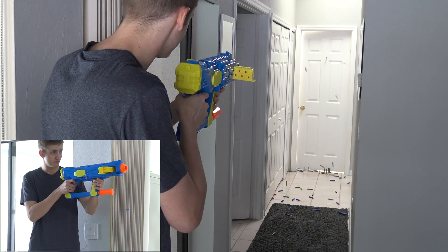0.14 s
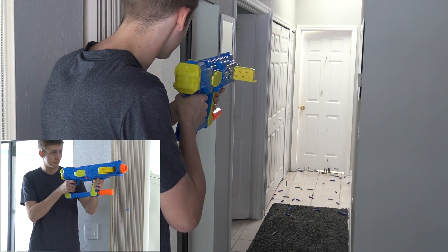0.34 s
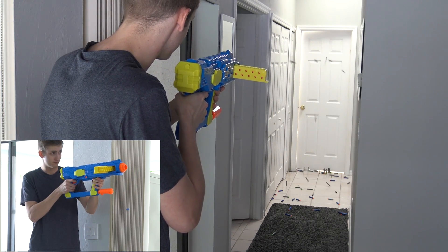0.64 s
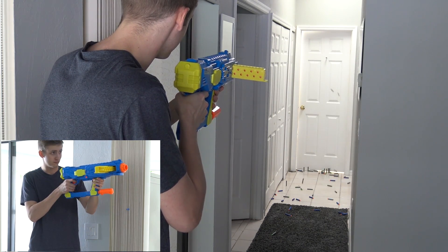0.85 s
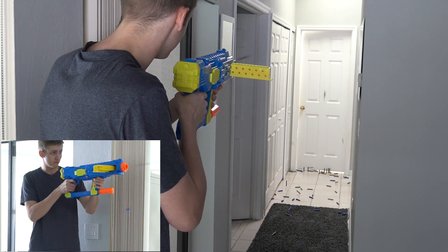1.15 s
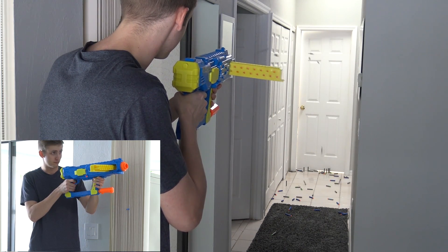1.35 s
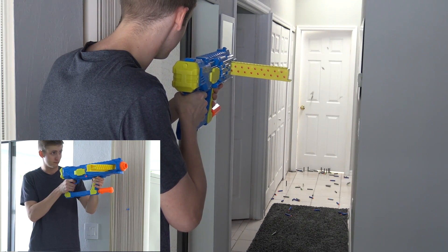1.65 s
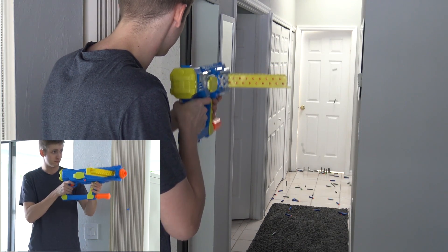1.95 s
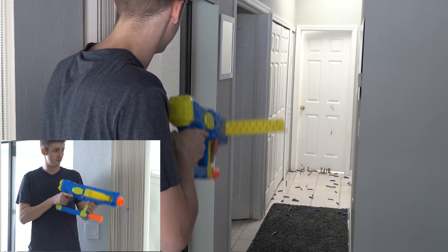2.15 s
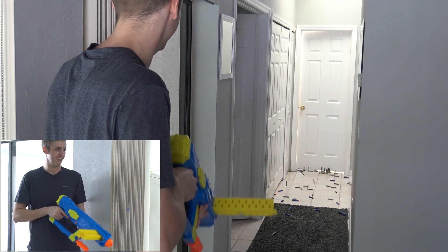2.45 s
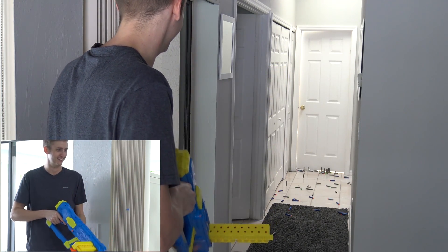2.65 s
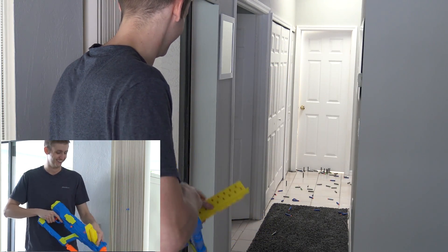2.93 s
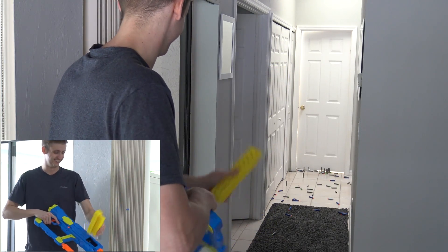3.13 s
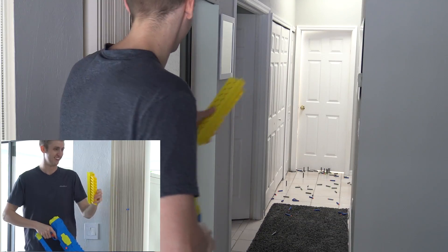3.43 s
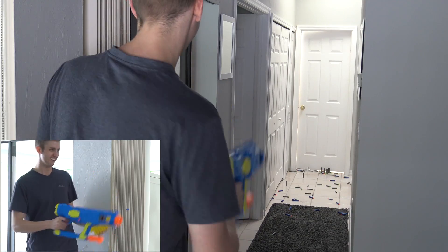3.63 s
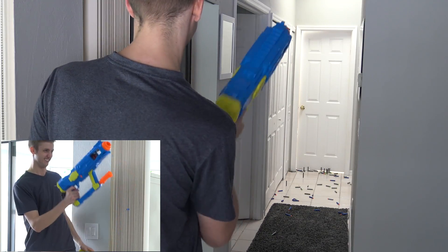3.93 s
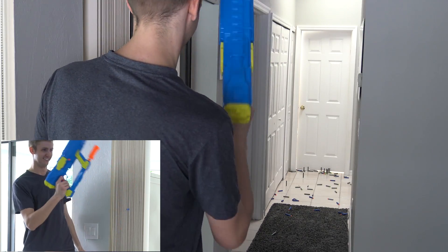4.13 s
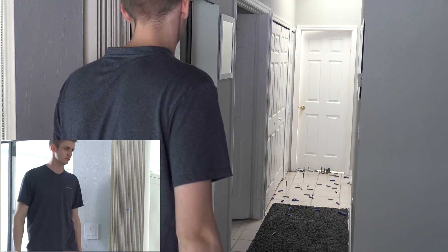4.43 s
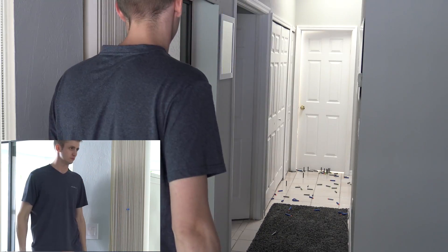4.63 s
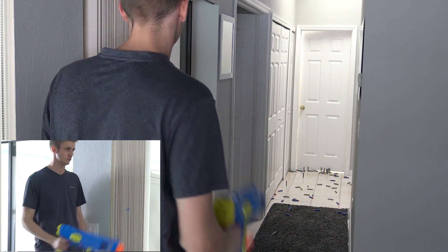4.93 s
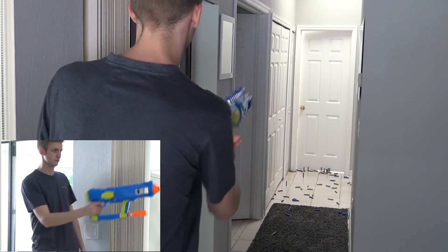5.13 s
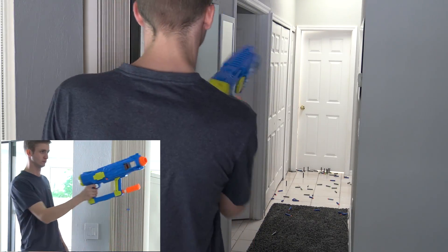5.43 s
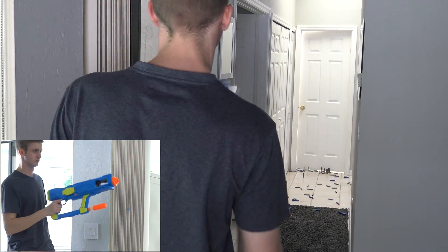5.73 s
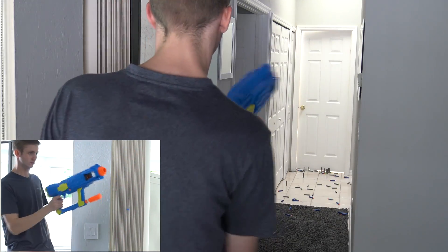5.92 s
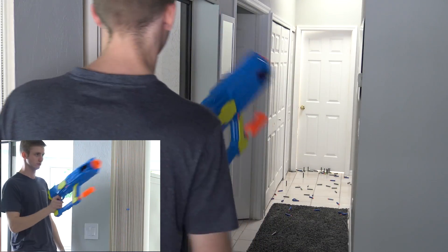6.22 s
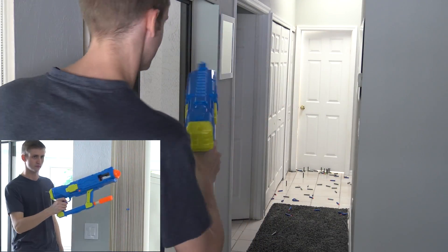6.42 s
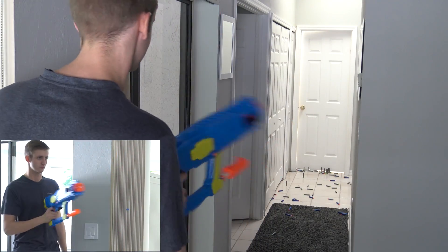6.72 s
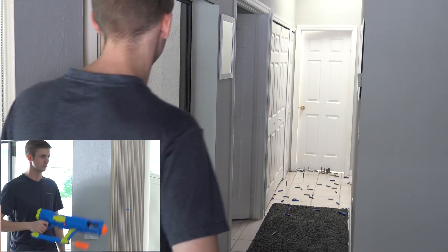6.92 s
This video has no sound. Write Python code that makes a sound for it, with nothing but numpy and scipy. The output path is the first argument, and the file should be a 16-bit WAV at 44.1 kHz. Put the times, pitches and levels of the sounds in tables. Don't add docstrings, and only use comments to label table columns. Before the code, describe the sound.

An air-powered toy dart blaster rattles off rapid bursts in an echoing hallway, with darts pattering on a door, magazine clacks and a long slowing burst.

```python
import sys
import numpy as np
from scipy import signal
from scipy.fft import rfft, irfft
from scipy.io import wavfile
from scipy.ndimage import uniform_filter1d

SR = 44100
rng = np.random.default_rng(int(sys.argv[2]) if len(sys.argv) > 2 else 0)


def put_to_file(sound):
    columns = np.atleast_2d(sound).T
    safe = np.clip(columns, -1, 1)
    whole_steps = np.round(safe * 32767)
    wavfile.write(sys.argv[1], SR, whole_steps.astype(np.int16))


def elevation(decibels):
    levels = np.asarray(decibels, float)
    return 10 ** (levels / 20)


N = 311787
LEAD = SR // 4
M = N + LEAD
SCENE_CHANGE_S = 4.502


def rms_one(x):
    return x / np.sqrt(np.mean(x ** 2) + 1e-20)


def in_time(rows, quiet=None):
    s, *columns = np.transpose(rows)
    return [np.interp((np.arange(M) - LEAD) / SR, s, c, quiet, quiet) for c in columns]


def at_hz(points, hz):
    return np.interp(np.log(hz), np.log(np.array(points)[:, 0]), np.array(points)[:, 1])


def colour(x, points):
    size = 4096
    cepstrum = irfft(np.log(elevation(at_hz(points, np.fft.rfftfreq(size, 1 / SR) + 1))))
    cepstrum[1:size // 2] *= 2
    cepstrum[size // 2 + 1:] = 0
    response = irfft(np.exp(rfft(cepstrum)))
    return signal.oaconvolve(x, response / np.sqrt(np.sum(response ** 2)))[:len(x)]


def resonate(x, hz, width_hz):
    r = np.exp(-np.pi * width_hz / SR)
    top = np.array([1, 0, -1]) * (1 - r * r) / 2
    return signal.lfilter(top, [1, -2 * r * np.cos(2 * np.pi * hz / SR), r * r], x + 1e-18)


def marks(times, db):
    out = np.zeros(M)
    np.add.at(out, np.round(np.asarray(times) * SR).astype(int) + LEAD, elevation(db))
    return out


def envelope(clicks, rise_s, fall_s):
    t = np.arange(SR // 10) / SR
    shape = (1 - np.exp(-t / rise_s)) * np.exp(-t / fall_s)
    return signal.oaconvolve(clicks, shape / shape.max())[:M]


def decaying(times, db, hz, fall_s):
    t = np.arange(SR // 16) / SR
    tone = np.sin(2 * np.pi * hz * t) * t / fall_s * np.exp(1 - t / fall_s)
    return signal.oaconvolve(marks(times, db), tone)[:M]


def swells(start, hold, db, rise_db, fall_db):
    t = np.arange(0, M + 64, 64)[:, None] / SR - LEAD / SR
    before_s = np.maximum(start - t, 0)
    after_s = np.maximum(t - start - hold, 0)
    gain = elevation(db - rise_db * before_s - fall_db * after_s).sum(axis=1)
    return np.interp((np.arange(M) - LEAD) / SR, t[:, 0], gain)


# pitch_hz, level_db (rms)
MAINS_HUM = [(60.3, -48), (86.1, -63), (119.5, -56.5), (290.7, -65)]
# pitch_hz, level_db (per Hz)
NOISE_FLOOR = [(15, -26.5), (30, -11), (70, -17), (130, -21), (250, -20.5), (450, -21), (900, -31),
               (1800, -33.5), (3500, -44), (6000, -45), (9000, -73.5), (16000, -76.5)]
HUM_DB, FLOOR_DB = (-8, 3), (-56.5, -50)
HUM_FADE_DB_PER_S = 2.5


def ambient():
    t = np.arange(M) / SR
    after = t - LEAD / SR - SCENE_CHANGE_S
    hum_db = np.where(after < 0, HUM_DB[0], HUM_DB[1] - HUM_FADE_DB_PER_S * after)
    floor_db = np.where(after < 0, *FLOOR_DB)
    hum = sum(np.sqrt(2) * elevation(db) * np.sin(2 * np.pi * hz * t) for hz, db in MAINS_HUM)
    return elevation(hum_db) * hum + elevation(floor_db) * colour(rng.standard_normal(M), NOISE_FLOOR)


# pitch_hz, t60_s
HALL_DECAY = [(130, 0.54), (300, 0.76), (550, 0.75), (1000, 0.97), (2800, 0.81), (7000, 0.74),
              (14000, 0.36)]
# pitch_hz, level_db
HALL_TONE = [(80, -8.5), (300, -0.5), (1000, 5), (3000, 0), (6000, -2), (9000, -3.5), (15000, -5.5)]
# delay_s, level_db
REFLECTIONS = [(.008, -2), (.021, -12), (.047, -12.5)]
FIXED_PATHS = 0.3


def hallway(sent):
    step = 32
    t = np.arange(SR * 3 // 2 // step) * step / SR
    cut = round(LEAD + SCENE_CHANGE_S * SR) // step
    white, out, response = rng.standard_normal((2, M)), 0, 0
    edges = 130 * 2 ** np.arange(0, 7.1, .25)
    echoes = sum(elevation(db + 12.5) * (t > s) * np.exp(-np.abs(t - s) / 0.0017) for s, db in REFLECTIONS)
    build = (1 - np.exp(-t / 0.022) + echoes) ** 2 * step / SR
    for k, (low, high) in enumerate(zip(edges, edges[1:])):
        hz = np.sqrt(low * high)
        band = signal.butter(2, [low, high], "band", fs=SR, output="sos")
        source, noise = signal.sosfilt(band, [sent + 1e-18, white[k % 2]])
        energy = np.mean(source[:M // step * step].reshape(-1, step) ** 2, axis=1)
        spread = build * elevation(at_hz(HALL_TONE, hz) - 60 * t / at_hz(HALL_DECAY, hz)) ** 2
        tail = [signal.fftconvolve(part, spread)[:len(part)] for part in np.split(energy, [cut])]
        response = response + noise[:len(t) * step] * np.repeat(np.sqrt(spread / step), step)
        strength = np.sqrt(np.abs(np.concatenate(tail)))
        out = out + rms_one(noise) * np.interp(np.arange(M) / step, np.arange(len(energy)), strength)
    same = [signal.fftconvolve(part, response)[:len(part)] for part in np.split(sent, [cut * step])]
    return np.sqrt(1 - FIXED_PATHS) * out + np.sqrt(FIXED_PATHS) * np.concatenate(same)


# start_s, hold_s, hiss_db, whistle_db (above the hiss)
AIR_PUFFS = [(0.88, 0.13, -28.5, 0), (1.096, 0.098, -28, -4.5), (2.3, .08, -47.5, -1),
             (2.431, 0.12, -44.5, -4), (2.621, .1, -59.5, -4), (3.647, 0.04, -41.5, -13),
             (4.652, 0.011, -46, -15), (4.853, .01, -53, -2), (4.931, .06, -60, 0)]
PUFF_RISE_DB_PER_S, HISS_FALL_DB_PER_S, WHISTLE_FALL_DB_PER_S = 702, 247, 88.5
THIN_BELOW_DB, THIN_FALL_DB_PER_S = 9, 129.5


def seep():
    s, hold, db, whistle_db = np.transpose(AIR_PUFFS)
    whistle_gain = swells(s, hold, db + whistle_db, PUFF_RISE_DB_PER_S, WHISTLE_FALL_DB_PER_S)
    hiss_gain = swells(s, hold, db, PUFF_RISE_DB_PER_S, HISS_FALL_DB_PER_S)
    thin_gain = swells(s, 0, db - THIN_BELOW_DB, PUFF_RISE_DB_PER_S, THIN_FALL_DB_PER_S)
    a, b, c = rng.standard_normal((3, M))
    whistle = resonate(resonate(a, 1310, 90), 1310, 200)
    hiss = resonate(b, 3640, 600) - elevation(-5.5) * resonate(b, 5100, 560) - elevation(-8) * resonate(b, 2000, 1200)
    thin = colour(c, [(5000, -17), (8500, -0.5), (13000, -1.5), (16000, -9.0)])
    return elevation(-3.5) * (whistle_gain * rms_one(whistle) + hiss_gain * rms_one(hiss) + thin_gain * thin)


# time_s, pitch_hz, level_db (rms)
VALVE_SQUEAL = [
    (3.656, 1485, -42),
    (3.69, 1426, -38.5),
    (3.7, 1400, -30),
    (3.72, 1337, -25),
    (3.726, 1340, -27.5),
]


def squeal():
    hz, level_db = in_time(VALVE_SQUEAL)[0], in_time(VALVE_SQUEAL, -200)[1]
    waver = 1 + 0.28 * rms_one(uniform_filter1d(rng.standard_normal(M), size=260))
    return np.sqrt(2) * elevation(level_db) * waver * np.sin(2 * np.pi * np.cumsum(hz) / SR)


# peak_s, tick_db, door_db (above the tick)
DART_VOLLEYS = [(0.159, -26, -6.5), (0.183, -7, -11.5), (0.214, -14, -8.5), (.275, -17, -10),
                (0.298, -6.5, -9), (.35, -27.5, -9.5), (0.892, -11, -18.5), (0.983, -13.5, -2.5),
                (1.09, -15.5, -6.5), (1.616, -15.5, -1.5), (1.754, -16, -1.5), (1.811, -11, -2.5),
                (1.935, -12.5, -3)]
# pitch_hz, width_hz, level_db
DOOR_MODES = [(146, 57, -9), (245, 40, -13.5), (340, 77, 2), (408, 150, 2), (548, 100, -1), (655, 70, -2.5)]
# pitch_hz, level_db (per Hz)
TIP_TICK = [(350, -53), (600, -3), (927, -13.5), (1260, -4.5), (1360, -12), (2270, -12.5), (3510, -9),
            (5940, -17.5), (14000, -54.5)]
VOLLEY_RISE_DB_PER_S, VOLLEY_FALL_DB_PER_S, DOOR_FALL_DB_PER_S = 452, 219, 262


def patter():
    s, tick_db, door_db = np.transpose(DART_VOLLEYS)
    tick_gain = swells(s, 0, tick_db, VOLLEY_RISE_DB_PER_S, VOLLEY_FALL_DB_PER_S)
    door_gain = swells(s, 0, tick_db + door_db, VOLLEY_RISE_DB_PER_S, DOOR_FALL_DB_PER_S)
    strength = elevation(0.87 * np.minimum(rng.exponential(1, M), 4))
    hits = (rng.random(M) < 700 / SR) * strength
    taps = envelope(hits, 0.0017, 0.01) * rng.standard_normal(M)
    door = sum(elevation(db) * resonate(taps, hz, width_hz) for hz, width_hz, db in DOOR_MODES)
    door = signal.sosfilt(signal.butter(4, 110, "high", fs=SR, output="sos"), door)
    return elevation(-0.5) * door_gain * rms_one(door) + elevation(-4.0) * tick_gain * rms_one(colour(taps, TIP_TICK))


# time_s, level_db (peak), ring_hz, brightness_db (per octave)
PLASTIC_CLACKS = [(2.9806, -25.5, 1240, -9), (3.0066, -11.5, 4670, -2), (3.0154, -22, 5160, -3),
                  (3.159, -13.5, 5000, -0.5), (3.1728, -5.5, 4200, 3), (3.632, -22.5, 2240, -1.5),
                  (3.655, -16, 1490, -5), (3.683, -15, 1390, -5.5), (4.4593, -26.5, 2000, -4),
                  (4.476, -23.5, 3330, -5.5), (4.4838, -18, 740, -3), (4.4944, -28, 703, 2),
                  (4.604, -43, 743, 4), (4.643, -35, 2820, -7), (4.655, -26, 770, -3),
                  (4.705, -34, 2310, -6), (4.847, -32.5, 734, -11), (4.888, -41, 703, 2.5),
                  (4.965, -31, 1480, -18), (5.0115, -14, 4770, -3), (5.0145, -6, 2640, -2.5)]
HIGH_TICKS = [(0.417, -37.5, 9660, 4.3), (0.859, -23, 11000, 5), (1.068, -26.5, 12400, 5),
              (1.0839, -26, 10820, 5), (4.645, -46, 9000, 3), (4.849, -36.5, 6000, 3)]
DULL_KNOCKS = [(3.013, -34.5, 291, -10), (3.008, -34, 140, -17), (2.8, -42, 240, -19), (3.2, -36, 180, -17)]
CLACK_S, TICK_S, KNOCK_S = 0.0084, .0015, .012


def clacks():
    out, t = np.zeros((2, M)), np.arange(SR // 8) / SR
    kinds = (PLASTIC_CLACKS, CLACK_S), (HIGH_TICKS, TICK_S), (DULL_KNOCKS, KNOCK_S)
    events = [(*row, length) for rows, length in kinds for row in rows]
    noise = rng.standard_normal((len(events), len(t)))
    for (s, db, hz, tilt_db, length), rattle in zip(events, noise):
        rattle = rattle * np.exp(-t / max(length, .001)) * (1 - np.exp(-t / (0.47 * length)))
        wide = colour(rattle, [(150, -12), (800, 1.5), (5000, tilt_db * 1.3), (16000, tilt_db * 4.6 - 22.5)])
        ring = elevation(15) * resonate(rattle, hz, hz / 13)
        at = round(s * SR) + LEAD
        out[:, at:at + len(t)] += elevation(db - 6.0) * np.array([wide, ring])
    return out


# time_s, level_db, pitch_hz, fall_s
MAGAZINE_TONES = [(3.006, -20, 5180, 0.0035), (3.177, -21, 2700, 0.0044), (3.175, -14.5, 3400, 0.0026),
                  (3.657, -33, 805, 0.0043)]


def magazine():
    return sum(decaying([s], db, hz, fall_s) for s, db, hz, fall_s in MAGAZINE_TONES)


# time_s, pop_db (peak)
EARLIER_SHOTS = [(-.075, -13.5), (-.02, -17.5)]
FIRST_BURST = [(0.4595, -6), (0.5095, -6.5), (0.567, -10), (0.635, -13.5)]
SECOND_BURST = [(1.1703, -8.5), (1.219, -10), (1.28, -11.5), (1.334, -12), (1.3934, -9), (1.4477, -13),
                (1.5289, -13), (1.5661, -13.5), (1.6156, -16), (1.6642, -14.5), (1.713, -15.5),
                (1.7645, -17.5), (1.8193, -13.5), (1.8964, -23)]
WEAK_BURST = [(3.7356, -15), (3.8028, -16.5), (3.895, -19.5)]
# time_s, pop_db (peak)
EMPTYING_BURST = [(5.0264, -14.5), (5.0453, -6.5), (5.0875, -13.5), (5.1706, -15.5), (5.4354, -13),
                  (5.7123, -14.5), (6.2005, -16.5), (6.3103, -15), (6.5081, -14), (6.5856, -13.5)]
ROW_SHOT = [0, 1, 2, 4, 10, 16, 26, 28, 31, 32]
SHOT_JITTER_S, SHOT_SCATTER_DB = 0.00027, 1.94


def firing():
    number = np.arange(ROW_SHOT[-1] + 1)
    s, db = np.transpose(EMPTYING_BURST)
    chance = rng.standard_normal((len(number), 2))
    run_s = np.interp(number, ROW_SHOT, s) + SHOT_JITTER_S * chance[:, 0]
    run_db = np.interp(number, ROW_SHOT, db) + SHOT_SCATTER_DB * chance[:, 1]
    run = np.transpose([run_s, run_db])
    return np.concatenate([EARLIER_SHOTS, FIRST_BURST, SECOND_BURST, WEAK_BURST, run]).T


# time_s, full_share (0-1)
TANK_PRESSURE = [(0, 0.7), (.46, 0.8), (1.2, 0.68), (1.8, 0.66), (1.9, 0), (3.7, 0), (5.03, .4),
                 (5.04, 0.9), (5.5, .8), (5.9, 0.42), (6.2, 0.27), (6.6, 0.19)]
# time_s, thump_db (above the pop)
HAND_RECOIL = [(0, -48.5), (.46, -24), (.64, -18), (1.2, -24), (1.3, -23.5), (1.55, -19.5), (1.66, -14.5),
               (1.8, -34), (1.9, -17), (3.8, -23), (5.03, -21), (5.17, -18.5), (5.35, -23), (5.85, -16.5),
               (6.28, -27), (6.6, -19.5)]
# pitch_hz, level_db (per Hz)
POP_SPECTRUM = [(2350, -33.5), (4000, -6.5), (5110, 2), (7070, -13), (8240, -8.5), (11600, -13.5),
                (12600, -15), (15600, -19.5)]
# pitch_hz, level_db (per Hz)
SHELL_SPECTRUM = [(88, -43.5), (150, -22.5), (324, -12.5), (473, -23), (524, -6), (643, -18), (777, -1.5),
                  (1130, -7), (2250, -4), (2530, -9), (3510, -8), (9000, -36), (11700, -46), (19800, -120)]
# pitch_hz, width_hz, level_db
SHELL_RINGS = [(802, 65, -1), (1127, 130, -1), (1279, 80, 4.5), (1578, 67, 1), (2018, 180, 0.5),
               (3462, 150, 2), (5200, 480, -15.5)]
# pitch_hz, level_db (below the pop), fall_s
GRIP_MODES = [(190.6, -21.5, .014), (255, -24.5, 0.03), (332, -21, 0.011), (527.5, -17.5, 0.014)]
SHELL_ABOVE_POP_DB, VALVE_HISS_DB, BARREL_TONE_DB = (9.5, 3.5), (-9, -28.5), (-21.5, -11.5)
PISTON_LAG_S, PUMPED_LAG_S = (.0006, 0.0022), (0.00065, 0.0069)
VALVE_LEAD_S = 0.006
SPRING_HZ, SPRING_WIDTH_HZ, SPRING_DB = 12600, 500, 7.5


def shots():
    s, pop_db = firing()
    full = np.interp(s, *np.transpose(TANK_PRESSURE))
    thump_db = np.interp(s, *np.transpose(HAND_RECOIL))
    shell_db, valve_db, barrel_db, lag, pumped = [low + (high - low) * full for low, high in (
        SHELL_ABOVE_POP_DB, VALVE_HISS_DB, BARREL_TONE_DB, PISTON_LAG_S, PUMPED_LAG_S)]
    lag = np.where(s < SCENE_CHANGE_S, lag, pumped)
    chance = rng.standard_normal((len(s), 3 + len(SHELL_RINGS)))
    lands = s + lag + 0.00098 * chance[:, 0]
    shell_db = pop_db + shell_db

    valve = envelope(marks(s - VALVE_LEAD_S, pop_db + valve_db + 4 + 1.4 * chance[:, 2]), 0.0006, 0.013)
    air = valve + envelope(marks(s, pop_db - 4.5), 0.00075, 0.0077)
    air += envelope(marks(s + 0.00056, pop_db - 17), .0003, 0.0005)
    air += envelope(marks(lands + 0.0038, pop_db - 12 + 2.9 * chance[:, 1]), 0.00094, 0.0023)
    blow = envelope(marks(lands, shell_db - 2.0), 0.00064, 0.0051)
    blow += envelope(marks(s, shell_db - 12.5), 0.0016, 0.0096) + elevation(1.5) * valve
    out = air * colour(rng.standard_normal(M), POP_SPECTRUM)
    out += blow * colour(rng.standard_normal(M), SHELL_SPECTRUM)

    for k, (hz, width_hz, db) in enumerate(SHELL_RINGS):
        struck = envelope(marks(lands, shell_db + db + 10 + 1.8 * chance[:, 3 + k]), 0.0012, 0.0046)
        out += resonate(struck * rng.standard_normal(M), hz, width_hz)
    sings = envelope(marks(s, pop_db + SPRING_DB - 12 + 5 * chance[:, 1]), .0005, .006)
    out += resonate(sings * rng.standard_normal(M), SPRING_HZ, SPRING_WIDTH_HZ)

    barrel = decaying(s - .002, pop_db + barrel_db, 315, 0.002)
    grip = sum(decaying(s + lag, pop_db + barrel_db + 14 + db, hz, fall_s) for hz, db, fall_s in GRIP_MODES)
    thump = decaying(s + lag, pop_db + thump_db + 12.5, 92, 0.0042)
    return out, barrel + grip + thump


def scene():
    far, leak = patter(), seep() + squeal()
    rattle, ring = clacks()
    ring = ring + magazine()
    blast, tones = shots()
    direct = blast + tones + rattle + ring + elevation(-5) * far + leak
    sent = elevation(14.5) * blast + elevation(4.5) * tones + elevation(13.5) * rattle
    sent = sent + elevation(4.0) * ring + elevation(7) * far + elevation(6.5) * leak
    after = (np.arange(M) - LEAD) / SR - SCENE_CHANGE_S
    heard = (after < 0) | (after > .06)
    return (direct * heard + hallway(sent * heard) + ambient())[None, LEAD:]


def squeeze(x, knee_db, share, release_db, size):
    level_db = 10 * np.log10(np.abs(uniform_filter1d(x ** 2, size=size)) + 1e-12)
    ramp = release_db * np.arange(N) / SR
    held_db = np.maximum.accumulate(level_db + ramp) - ramp
    return elevation(uniform_filter1d(-share * np.maximum(held_db - knee_db, 0), size=size // 2))


def low_pass(x):
    return signal.sosfilt(signal.butter(12, 15750, fs=SR, output="sos"), x)


def record(dry):
    bass = signal.sosfiltfilt(signal.butter(2, 160, fs=SR, output="sos"), dry[0], padtype="even")
    x = dry - bass + bass * squeeze(bass, knee_db=-43.5, share=0.45, release_db=159.0, size=400)
    x = x * squeeze(x[0], knee_db=-9.0, share=0.72, release_db=45, size=220)
    x = np.clip(2.18 * np.tanh(x / 2.068), -1, 1)
    x = signal.sosfilt(signal.ellip(10, .5, 60, 15720, fs=SR, output="sos"), x)
    return low_pass(x)


dry = scene()
out = record(dry)
put_to_file(out)
```